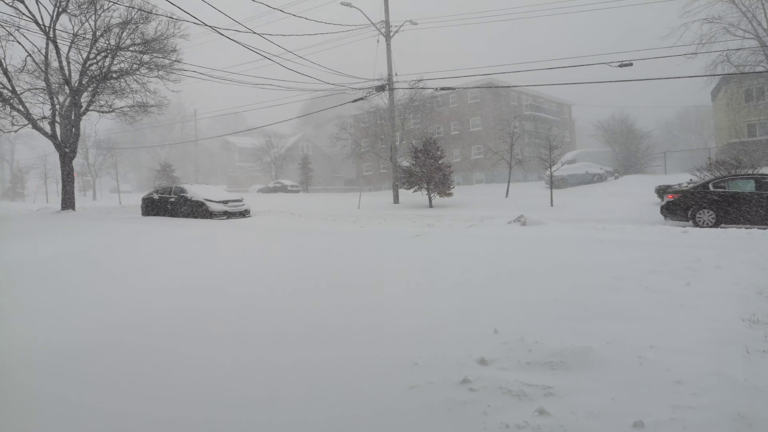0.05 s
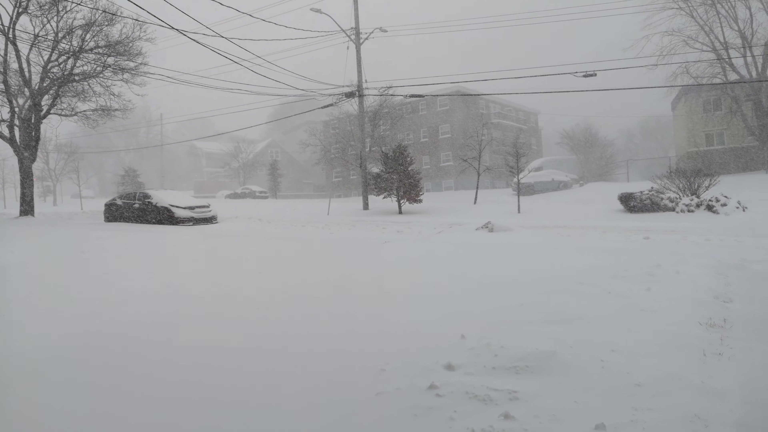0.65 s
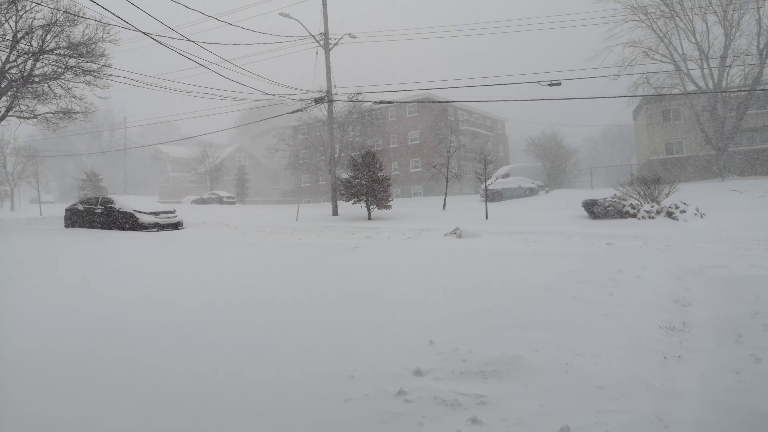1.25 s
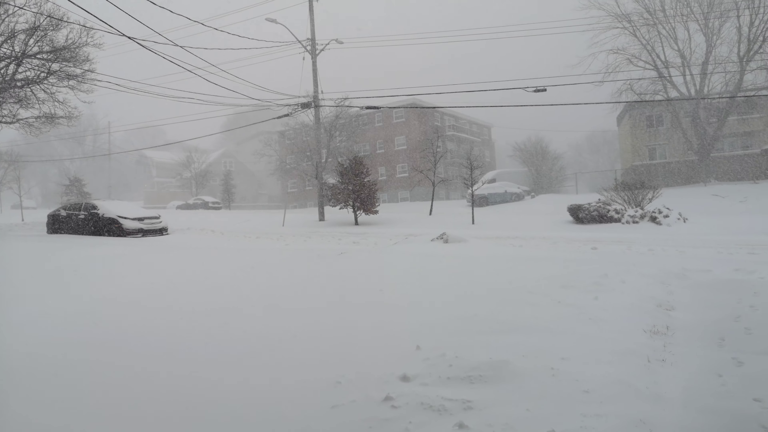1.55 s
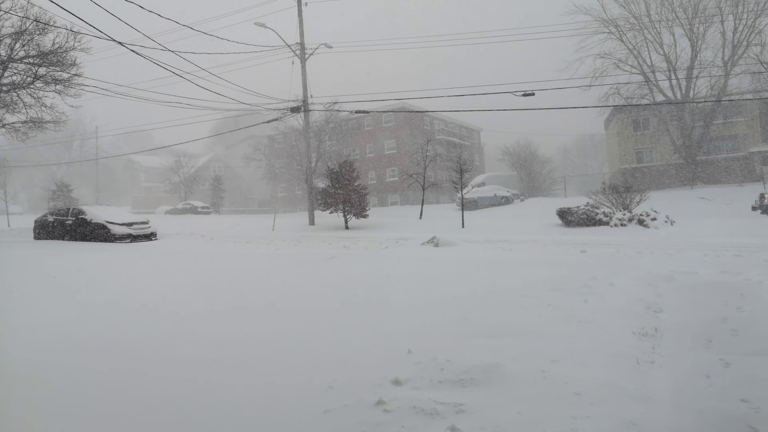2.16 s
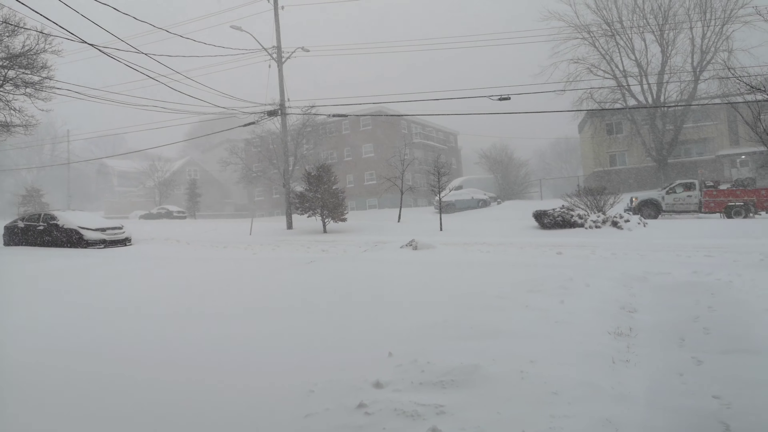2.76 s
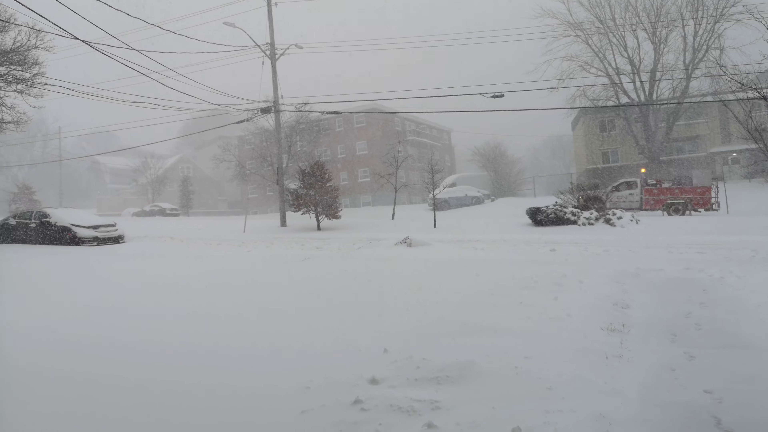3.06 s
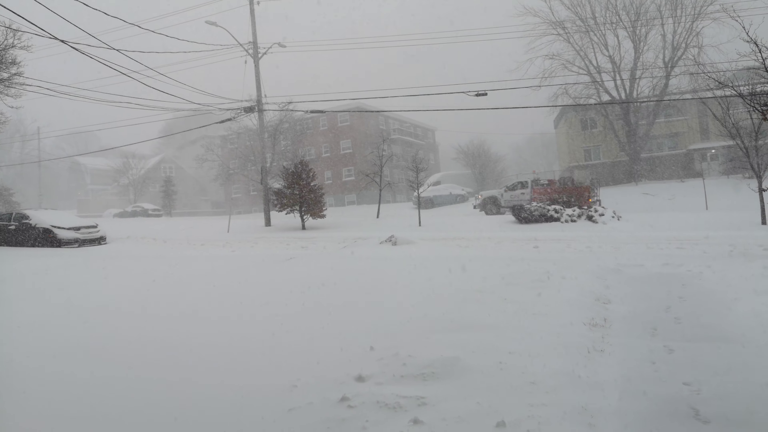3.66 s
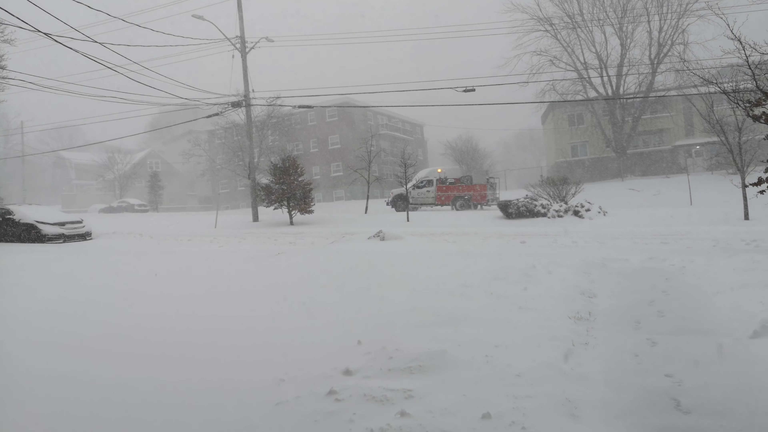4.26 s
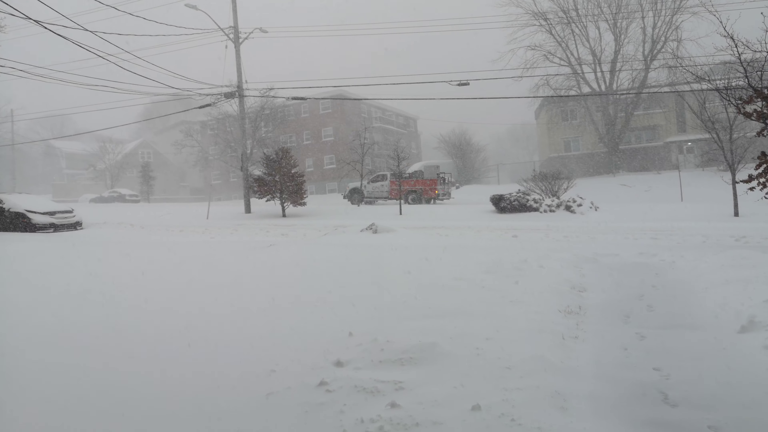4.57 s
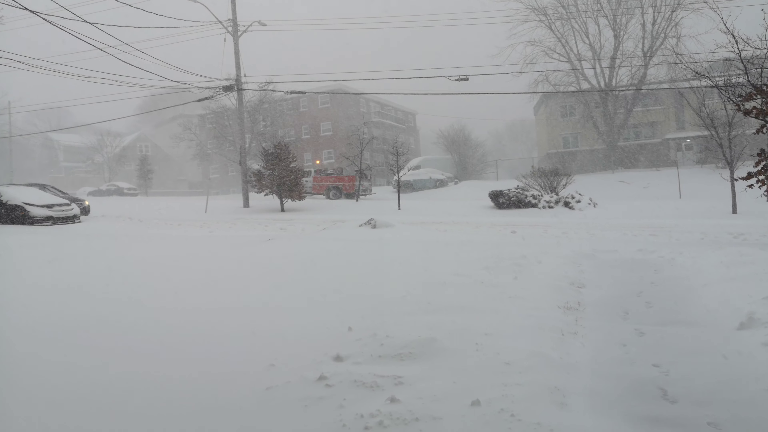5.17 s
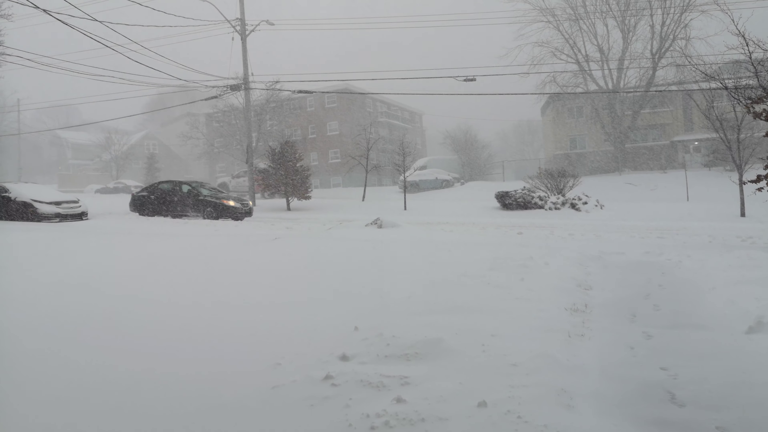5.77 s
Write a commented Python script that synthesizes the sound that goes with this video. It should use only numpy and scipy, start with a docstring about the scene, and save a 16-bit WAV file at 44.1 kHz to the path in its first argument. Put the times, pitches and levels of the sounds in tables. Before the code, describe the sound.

On a residential street in a blizzard, a plough truck drones in from the right with a burbling exhaust. Its steel blade scrapes packed snow in uneven surges, hissing, squealing and faintly ringing. A car's exhaust booms once near the start, and its deep engine note swells, then rises in pitch and weakens. The truck moves toward the centre while wind roars in the trees and rumbles on the microphone.

```python
"""A V8 plough truck drones in from the right through a blizzard on a residential street.
Its uneven exhaust burbles, its tyres press the snow, and friction drives the resonances of its
steel blade, which scrapes in surges, squeals, rings and throws snow. A car's exhaust booms once;
its deep engine note swells, then rises in pitch and weakens. Behind them distant engines hum,
and the storm roars in the trees and rumbles on the two-port microphone."""
import sys
import numpy as np
from scipy import signal
from scipy.fft import rfft, irfft
from scipy.io import wavfile
from scipy.ndimage import uniform_filter1d, map_coordinates

SR = 44100
rng = np.random.default_rng(int(sys.argv[2]) if len(sys.argv) > 2 else 0)


def waveform_to_disk(signal):
    """Save audio, clipped to [-1, 1], as 16-bit WAV at the path in sys.argv[1]."""
    frames = np.transpose(np.atleast_2d(signal))
    scaled = np.clip(frames, -1, 1) * 32767
    samples = np.round(scaled).astype(np.int16)
    wavfile.write(sys.argv[1], SR, samples)


N = 265967
TIME_S = np.arange(N) / SR
FRAME_S = np.arange(N // 512 + 5) * 512 / SR
BIN_HZ = np.fft.rfftfreq(2048, 1 / SR)


# V8 firing rate: time_s, firing_hz
TRUCK_FIRING = [(0, 86.5), (.6, 91.56), (.9, 82.3), (2, 83.9), (3.2, 86.46), (4.1, 93.43), (5.3, 101.1),
                (6.03, 99.3)]
# firing note, before trim: time_s, level_db
TRUCK_DRONE = [(0, -52.5), (.65, -42), (.95, -36.5), (1.7, -34.5), (2.9, -41), (3.85, -53), (4.4, -42),
               (4.7, -42.5), (5.25, -35), (6.03, -42)]
# exhaust burble, before trim: time_s, level_db
TRUCK_BURBLE = [(0, -60), (.95, -34.5), (1.9, -38), (2.5, -44), (3.8, -42.5), (4.4, -46.5), (4.8, -51),
                (6.03, -61)]
# burble partials: cycle_order, relative_db
BURBLE_ORDERS = [(5, -12), (6, -13), (7, -6), (9, -4), (10, -6), (11, -1), (12, -15), (13, -13)]

def truck_engine():
    """Eight firings a cycle; their uneven spacing in the exhaust adds a burble of nearby orders."""
    firing_hz = follow(TRUCK_FIRING)[0]
    drone_db = follow(TRUCK_DRONE)[0] - 0.68
    burble_db = follow(TRUCK_BURBLE)[0] - 4.1
    burble = sum(gain_of(db + 1.2 * wander(1.5)) * sine(firing_hz * order / 8)
                 for order, db in BURBLE_ORDERS)
    return gain_of(drone_db) * sine(firing_hz) + gain_of(burble_db) * unit_rms(burble)


# blade meets packed snow: middle_s, length_s, level_db, whistle_extra_db, bright_db, snow_db
SURGES = [(0.534, 0.24, -45.5, 8, 0.5, -63.5), (0.76, 0.085, -52, 7, 4.5, -62.5),
          (1.28, 0.27, -48, -20, 1, -62), (1.705, 0.34, -46, -2, -1, -64.5), (2.064, 0.2, -46.5, 1, 2, -62),
          (2.403, .4, -51, -17, 4.5, -59.5), (2.82, 0.2, -51, 4, 3, -61), (3.312, 0.07, -55, 9, 0, -67),
          (3.829, 0.18, -47.5, 5, -3, -67), (3.98, 0.18, -58.5, -19, 9.5, -64),
          (4.553, 0.24, -53, 7.5, 5.5, -64.5), (4.928, 0.31, -53.5, 5.5, 4, -64),
          (5.185, 0.21, -47, 4, 2, -68), (5.821, 0.29, -56.5, -6, 6.5, -62)]

def surging(steady_db, peaks_db):
    """Scrape amplitude: steady drag and surges, summed in power."""
    power = sum(gain_of(db) ** 2 * swell(middle_s, length_s)
                for (middle_s, length_s, *_), db in zip(SURGES, peaks_db))
    return np.sqrt(gain_of(steady_db) ** 2 + power)


# drag between surges: time_s, level_db
BLADE_DRAG = [(0, -59), (.3, -53.5), (1, -54), (1.5, -56.5), (2.9, -51.5), (3.5, -52.5), (4.3, -49),
              (5.7, -52), (6.03, -63.5)]
# edge contact, 0 skimming snow to 1 on the road: time_s, bite
BLADE_BITE = [(0, 0.13), (.8, 0.073), (1.8, 0.26), (2.3, 0.049), (3.4, 0.78), (3.8, 1), (6.03, .85)]
# blade resonances, low to high: centre_hz, width_hz, left_db, right_db, full_bite_change_db
HOOT_MODES = [(1366, 210, -3.5, -6, 0)]
RUSH_MODES = [(1690, 280, -15, 1, -4), (1990, 360, -2, -1.2, 4.5), (2246, 140, -10, -0.12, 5),
              (2580, 320, -7, -1.7, 1)]
WHISTLE_MODES = [(2695, 180, -3, 7.5, 6), (3040, 255, -15, -3, 1.5)]
HISS_MODES = [(3110, 810, -8.5, -6.5, 4), (3834, 560, -25.5, -0.5, 4), (4320, 310, -21, -11, 8.5),
              (4860, 690, -12, 1.5, -10), (5490, 170, -19, -4, 0.5)]
RING_MODES = [(5805, 170, -0.5, 5, 0)]
# hoot against scrape: time_s, relative_db
HOOT_SHARE = [(0, -6.5), (1.7, -14), (2.6, -7), (3.9, -5), (5.2, -8.5), (6.03, 0)]
# cutting-edge ring against hiss: time_s, relative_db
RING_SHARE = [(0, -22), (1.2, -12), (2.6, -11), (4.5, -12.5), (5.2, -32), (6.03, -14)]
# thrown snow: freq_hz, left_db, right_db
SPRAY_SPECTRUM = [(1500, -3.5, -20), (4000, -6, -4), (6300, -5, -17), (7220, -2.5, -3), (7980, 3, -13),
                  (8370, -8.5, -4), (9340, -5.5, -4), (10360, -32, -6.5), (12100, -17, -17),
                  (15000, -21, -17)]

def plough():
    """The blade scrapes and throws snow, juddering as one. Bright surges hiss, dull ones hoot."""
    _, _, level_db, whistle_extra_db, bright_db, snow_db = np.transpose(SURGES)
    drag_db, bite = follow(BLADE_DRAG)[0], follow(BLADE_BITE)[0]
    hoot_drive = gain_of(follow(HOOT_SHARE)[0]) * surging(drag_db, level_db - bright_db)
    whistle_drive = gain_of(-5 + 4.5 * bite) * surging(drag_db, level_db + whistle_extra_db)
    hiss_drive = gain_of(-2.5 + 3 * bite) * surging(drag_db, level_db + bright_db)
    spray_drive = surging(-58.5, snow_db + 4.5)
    hoot = hoot_drive * friction(HOOT_MODES, patchy_db=1.0)
    rush = surging(drag_db, level_db) * friction(RUSH_MODES, patchy_db=1.8)
    whistle_noise = gain_of(-3) * friction(WHISTLE_MODES, patchy_db=4.8)
    whistle = whistle_drive * (whistle_noise + squeal(whistle_drive))
    ring = gain_of(follow(RING_SHARE)[0]) * friction(RING_MODES, patchy_db=3.0)
    hiss = hiss_drive * (friction(HISS_MODES, patchy_db=2.2) + ring)
    spray = spray_drive * stereo_noise(gain_of(spectrum(SPRAY_SPECTRUM)), patchy_db=1.5)
    judder = wander(17)
    return (hoot + rush + whistle + hiss) * gain_of(0.4 * judder) + spray * gain_of(0.41 * judder)


def friction(modes, patchy_db):
    """Friction noise through blade resonances whose balance shifts as the edge bites."""
    bite = follow(BLADE_BITE, FRAME_S)[0][:, None]
    power = 0
    for centre_hz, width_hz, left_db, right_db, change_db in modes:
        mode_db = np.array([left_db, right_db])[:, None, None] + change_db * bite
        resonance = 1 / (1 + ((BIN_HZ - centre_hz) / (0.81 * width_hz)) ** 2) ** 2
        power += gain_of(mode_db) ** 2 * resonance
    return stereo_noise(np.sqrt(power / power.mean(axis=(0, 2), keepdims=True)), patchy_db)


def squeal(drive, pitch_hz=2770, jitter=.018, flicker_db=4, full_hold_db=-44):
    """Stick and slip at the blade's whistle: an unsteady tone that takes hold when driven hard."""
    flicker = gain_of(flicker_db * wander(43))
    tone = unit_rms(flicker * sine(pitch_hz * (1 + jitter * wander(61.5))))
    hold = np.sqrt(np.minimum(drive / gain_of(full_hold_db), 1))
    left_right_db = [[-7.5], [-1.5]]
    return gain_of(left_right_db) * hold * tone


# low steel modes: start_s, end_s, first_hz, last_hz, level_db
STEEL_MOANS = [(0.338, 1.125, 752, 734, -62), (1.07, 3.099, 810, 805, -65.5), (0.893, 2.3, 995, 1028, -60),
               (1.033, 1.697, 1200, 1180, -62), (1.506, 2.903, 1075, 1098, -63.5),
               (1.704, 3.005, 600, 603, -68), (3.4, 4.05, 724, 729, -68), (4.953, 5.503, 1295, 1294, -61)]

def steel_moans(flicker=.25, fuzz=.6):
    """Low modes of the dragged steel catch briefly: faint, fuzzy tones that swell and fade."""
    out = np.zeros(N)
    for start_s, end_s, first_hz, last_hz, level_db in STEEL_MOANS:
        progress = np.clip((TIME_S - start_s) / (end_s - start_s), 0, 1)
        pitch_hz = first_hz + (last_hz - first_hz) * progress
        core = (1 + flicker * wander(23)) * sine(pitch_hz)
        tone = unit_rms(core + fuzz * wander(18) * sine(pitch_hz))
        out += gain_of(level_db) * np.sqrt(abs(np.sin(np.pi * progress))) * tone
    return out


# tyres pressing snow: time_s, level_db
TYRE_LEVEL = [(0, -57), (.5, -58.5), (1.1, -64), (2.7, -62), (4.2, -77), (6.03, -67)]
# tread noise: freq_hz, relative_db
TREAD_SPECTRUM = [(120, -27), (250, 0.5), (420, -2), (700, 1), (1000, -5), (1500, -17), (3000, -42)]

def truck_tyres():
    """Tread noise, muffled by snow."""
    tread = stereo_noise(gain_of(spectrum(TREAD_SPECTRUM)), patchy_db=2.5)
    return gain_of(follow(TYRE_LEVEL)[0]) * tread


# truck bearing: time_s, left_delay_ms
TRUCK_BEARING = [(0, 0.43), (.7, 0.45), (1.7, 0.33), (2.6, 0.25), (3.3, 0.14), (3.75, 0.14), (4.3, 0.11),
                 (4.7, 0.053), (5.1, -0.02), (6.03, -0.089)]

def from_bearing(stereo):
    """The left port hears the truck late while it is off to the right."""
    left, right = stereo
    delay_samples = follow(TRUCK_BEARING)[0] * SR / 1000
    return np.array([map_coordinates(left, [np.arange(N) - delay_samples], order=3), right])


# car engine note, before trim: time_s, firing_hz, level_db
CAR_FIRING = [(0.0, 45, -59), (0.07, 44.5, -38), (0.48, 44.67, -38), (0.97, 41.88, -40.5),
              (1.44, 41.3, -43), (1.46, 42, -35.5), (1.73, 43.35, -34.5), (2.18, 42.9, -31),
              (3.49, 41.16, -36.5), (3.95, 41.26, -34.5), (4.2, 43.14, -35), (4.55, 52, -46),
              (5.31, 53.1, -49), (5.76, 52.7, -47), (6.03, 52, -40.5)]

def car_engine():
    """One deep firing note that swells, then rises in pitch and weakens."""
    firing_hz, level_db = follow(CAR_FIRING)
    return gain_of(level_db - 0.64 + 0.31 * wander(7.5)) * sine(firing_hz)


def exhaust_boom(middle_s=.51, length_s=.35, level_db=-40, middle_hz=113, sag_hz_per_s=35.6):
    """The car's exhaust booms once, rough and sinking in pitch."""
    pitch_hz = middle_hz - sag_hz_per_s * np.clip(TIME_S - middle_s, -length_s, length_s)
    rough = unit_rms(wander(28) * sine(pitch_hz) + wander(30) * sine(pitch_hz))
    return gain_of(level_db) * np.sqrt(swell(middle_s, length_s)) * rough


# far engines: pitch_hz, level_db, drift_ratio
ENGINE_HUMS = [(26.8, -44.5, 0.027), (174.9, -64, 0.02555)]

def distant_engines():
    """Steady hums with a slight drift in pitch."""
    return sum(gain_of(level_db) * sine(pitch_hz * (1 + drift * wander(5.67)))
               for pitch_hz, level_db, drift in ENGINE_HUMS)


# wind pressure on the microphone: time_s, level_db
BUFFET_LEVEL = [(0, -43.5), (1.5, -46), (3.6, -45.5), (4.4, -43.5), (5.3, -40), (6.03, -42.5)]
# wind rumble: freq_hz, relative_db
BUFFET_SPECTRUM = [(4, -18), (15, -9), (33, 3.5), (50, -2), (65, -9.5), (100, -2), (135, -30.5),
                   (160, -13.5), (400, -60)]

def wind_buffet():
    """Wind pressure rumbles on the microphone ports."""
    rumble = stereo_noise(gain_of(spectrum(BUFFET_SPECTRUM)), patchy_db=-0.8, diffuse=True)
    return gain_of(follow(BUFFET_LEVEL)[0]) * rumble


# storm roar: freq_hz, left_db, right_db
STORM_SPECTRUM = [(60, -1, 3.5), (150, -2, 0.5), (222, 0, 1), (325, 0, -2), (363, -9, -6.5), (573, -8, -8),
                  (740, -8, -7), (1130, -10.5, -10.5), (1550, -15.5, -20), (2420, -10.5, -17),
                  (3270, -23, -14), (5300, -35, -9.5), (6650, -19.5, -25.5), (15000, -46, -59)]

def storm(level_db=-51.0):
    """Wind roars in the trees and along the street."""
    gain = gain_of(level_db + 0.46 * wander(4.1))
    return gain * stereo_noise(gain_of(spectrum(STORM_SPECTRUM)), patchy_db=0.2, diffuse=True)


# left-right likeness: freq_hz, storm_coherence, truck_coherence
COHERENCE = [(60, 1, 1), (130, 0.98, 1), (296, 0.79, 0.61), (450, -0.24, 0.16), (700, -0.54, 0.96),
             (1400, 0.31, 0.64), (3120, 0.048, 0.52), (5170, 0.78, 0.1), (7940, -0.07, 0.078)]

def stereo_noise(magnitude, patchy_db, diffuse=False):
    """Shaped, patchy noise of rms 1; the storm's coherence if diffuse, else the truck's."""
    coherence = spectrum(COHERENCE)[0 if diffuse else 1]
    a, b, c, d, patches = rng.standard_normal((5, len(FRAME_S), len(BIN_HZ)))
    patches = uniform_filter1d(patches, size=8, axis=0)
    patches = unit_rms(uniform_filter1d(patches, size=10, axis=1))
    left = a + 1j * b
    right = coherence * left + np.sqrt(1 - coherence ** 2) * (c + 1j * d)
    frames = np.array([left, right]) * magnitude * gain_of(patchy_db * patches)
    _, noise = signal.istft(frames.transpose(0, 2, 1), nperseg=2048, noverlap=1536)
    return unit_rms(noise[:, :N])


def sine(pitch_hz):
    """Sine of rms 1 along a pitch curve."""
    return np.sqrt(2) * np.sin(2 * np.pi * (np.cumsum(pitch_hz) / SR + rng.random()))


def wander(rate_hz):
    """Random drift of rms 1, rolled off above rate_hz."""
    coarse_s = TIME_S[::100]
    hz = np.fft.rfftfreq(len(coarse_s), coarse_s[1])
    white = rfft(rng.standard_normal(len(coarse_s)))
    slow = irfft(white / (1 + (hz / rate_hz) ** 4), len(coarse_s))
    return unit_rms(np.interp(TIME_S, coarse_s, slow))


def swell(middle_s, length_s):
    """Power bump: 1 in the middle, one half at either end."""
    return .5 ** (abs(2 * (TIME_S - middle_s) / length_s) ** 1.88)


def follow(rows, at_s=TIME_S):
    """Columns of a time table, interpolated at at_s."""
    time_s, *columns = np.transpose(rows)
    return [np.interp(at_s, time_s, column) for column in columns]


def spectrum(rows):
    """Columns of a frequency table at BIN_HZ, shape (columns, 1, bins)."""
    hz, *columns = np.transpose(rows)
    return np.array([np.interp(np.log(BIN_HZ + 1), np.log(hz + 1), c) for c in columns])[:, None]


def gain_of(db):
    """Decibels to amplitude."""
    return 10 ** (np.asarray(db) / 20)


def unit_rms(x):
    """Scales to rms 1."""
    return x / np.sqrt(np.mean(x ** 2) + 1e-20)


def scene():
    """Truck and plough travel together, amid the other engines and the storm."""
    truck = from_bearing(truck_engine() + truck_tyres() + plough() + steel_moans())
    return truck + car_engine() + exhaust_boom() + distant_engines() + wind_buffet() + storm()


def record(dry):
    """Soft start and band limit."""
    fade_in_s, cutoff_hz = .004, 15350
    lowpass = signal.firwin(511, cutoff_hz, window=("kaiser", 9), fs=SR)
    return signal.oaconvolve(dry * np.minimum(TIME_S / fade_in_s, 1), lowpass[None], "same")


dry = scene()
out = record(dry)
waveform_to_disk(out)
```